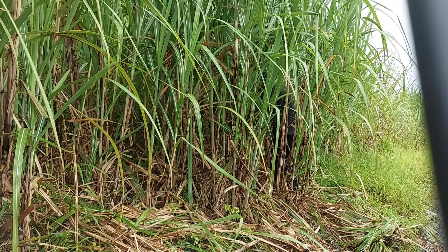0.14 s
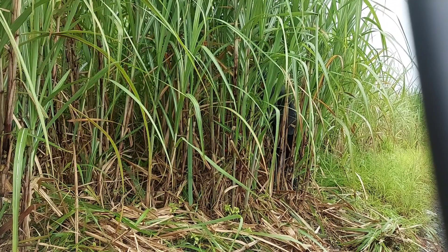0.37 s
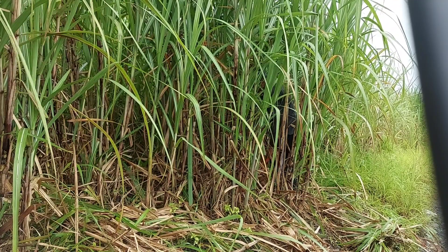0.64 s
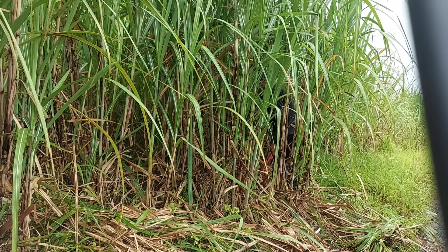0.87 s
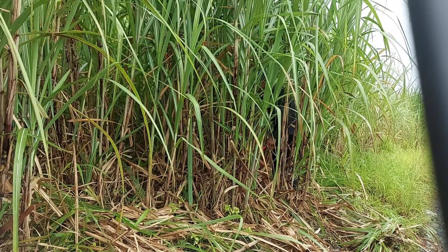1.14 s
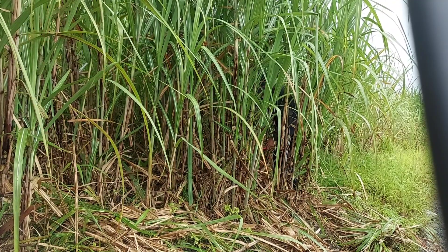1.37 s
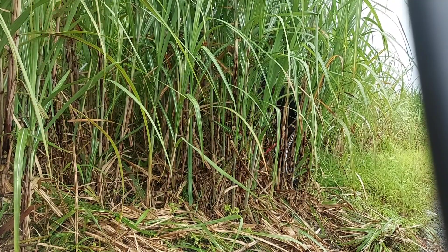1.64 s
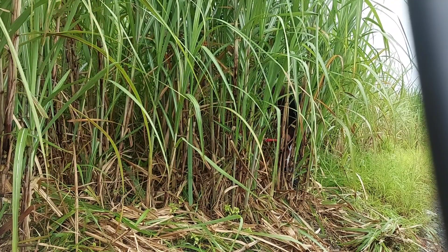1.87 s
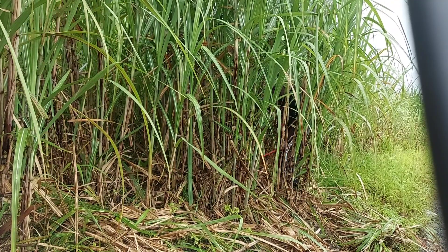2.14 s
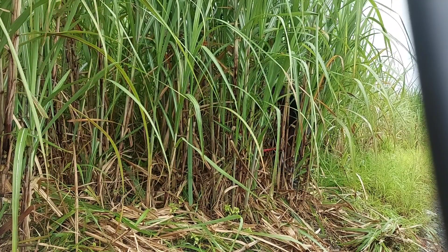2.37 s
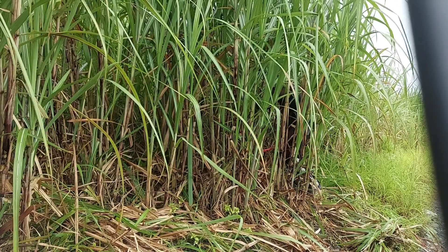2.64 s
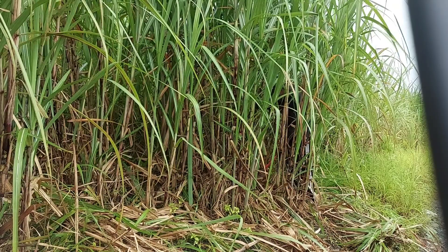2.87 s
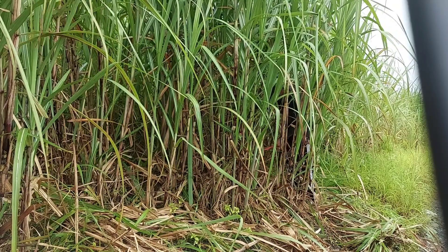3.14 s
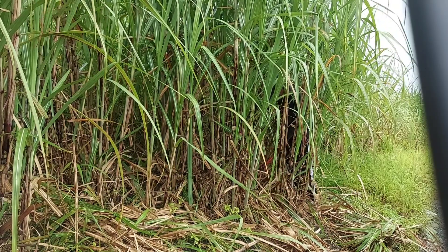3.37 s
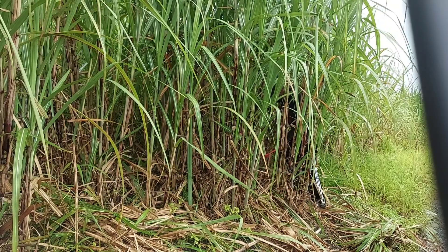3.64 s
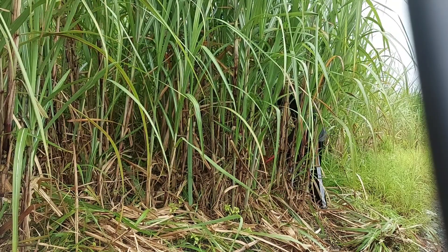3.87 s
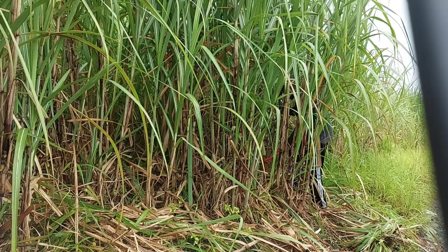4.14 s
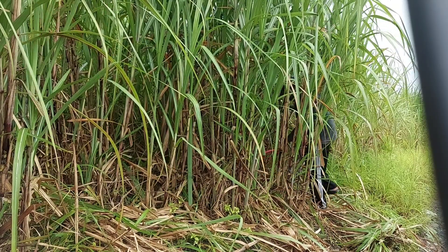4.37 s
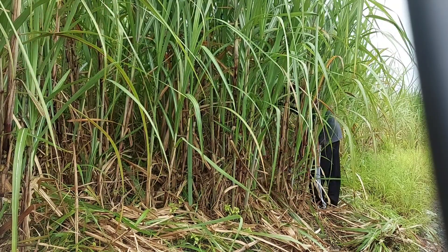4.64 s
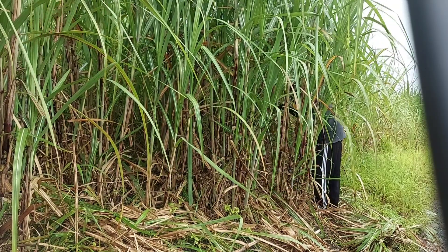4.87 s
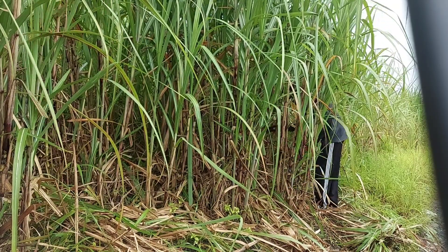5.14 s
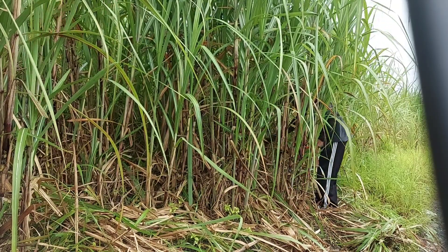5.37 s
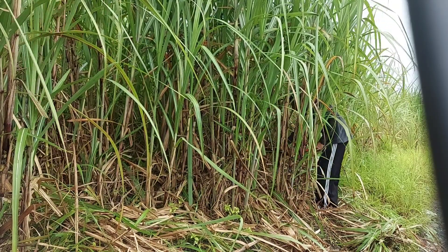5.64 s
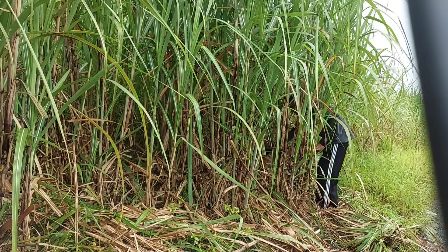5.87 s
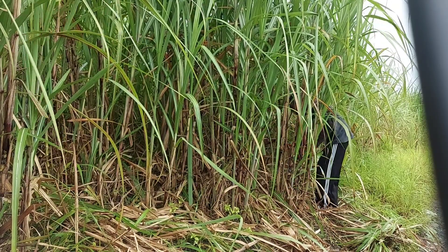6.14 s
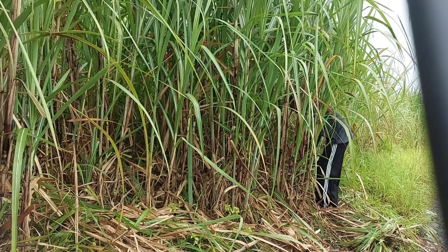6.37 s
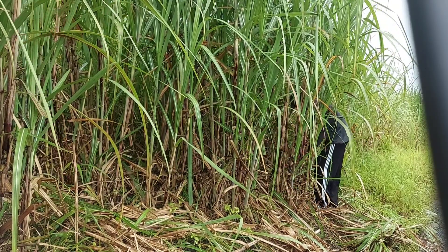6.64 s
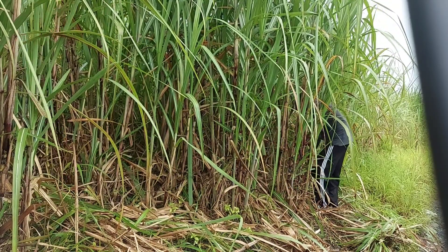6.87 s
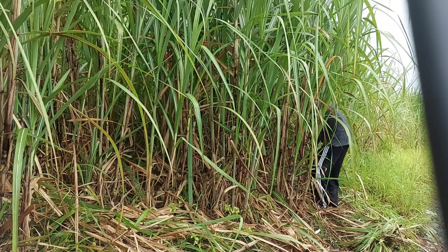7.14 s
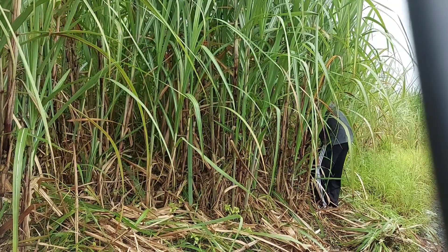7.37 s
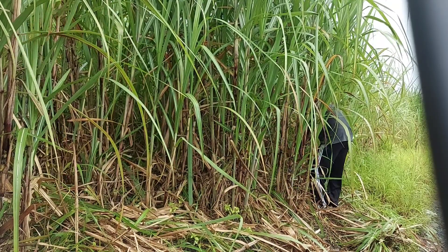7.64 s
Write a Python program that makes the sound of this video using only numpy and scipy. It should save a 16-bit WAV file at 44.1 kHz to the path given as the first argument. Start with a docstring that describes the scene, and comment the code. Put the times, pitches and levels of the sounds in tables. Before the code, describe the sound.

Someone strips dry leaves in a cane field, snapping and crackling in uneven bursts, over treble insect buzz, falling bird whistles and distant dove coos.

```python
"""Dry leaves are stripped in a cane field: tears and rustles are dense noise snaps shaped by effort,
and stalk cracks are clicks with a short ring and a low knock.
Insects buzz in the treble as resonated noise, one nearer insect chirps, a small bird whistles falling notes
and a dove coos far off, as gliding tones and breathy tones.
Filtered noise makes an uneven low rumble, a smooth faint background hiss and, late on, a far motor's hum."""
import sys
import numpy as np
from scipy import signal
from scipy.io import wavfile
from scipy.ndimage import uniform_filter1d

SR = 44100
rng = np.random.default_rng(int(sys.argv[2]) if len(sys.argv) > 2 else 0)


def transcribe(u):
    """Save the signal u as a 16-bit wav file named by the first command-line argument.

    u: samples, shape (n,) or (channels, n), limited to [-1, 1]; the rate is SR.
    q: integer samples, one column per channel.
    """
    v = np.clip(np.atleast_2d(u).T, -1, 1)
    q = np.round(v * 32767).astype(np.int16)
    wavfile.write(sys.argv[1], SR, q)


def magnitude_from_level(level_db):
    """Linear magnitude for a level in decibels (20 dB per decade)."""
    exponent = np.asarray(level_db, float) / 20
    return 10 ** exponent


N = 341775  # samples, 7.75 s


def evened(x):
    """Scales to rms 1."""
    return x / np.sqrt(np.mean(x ** 2) + 1e-20)


def read(points, hz):
    """Reads a spectrum table on a log-frequency axis."""
    f, value = np.transpose(points)
    return np.interp(np.log(hz + 1), np.log(f + 1), value)


def curve(points, t):
    """Reads a two-column time table at the times t."""
    return np.interp(t, *np.transpose(points))


def add(mix, s, sound):
    """Mixes a two-channel sound in at time s."""
    part = mix[:, round(s * SR):][:, :sound.shape[1]]
    part += sound[:, :part.shape[1]]


def pan(db):
    """Left and right gains for a level difference, left minus right."""
    return magnitude_from_level(np.array([[db / 2], [-db / 2]]))


def spectra(drive, same, side, lag, size):
    """Short-time spectra of a left-right pair: drive 0 is common, drives 1 and 2 belong to one side each."""
    hz, t, z = signal.stft(drive, SR, nperseg=size, noverlap=size * 3 // 4)
    likeness = np.clip(read(same, hz), 0, 1)[:, None]
    late = np.exp(-2j * np.pi * hz[:, None] * curve(lag, t) / SR)  # the left ear hears it later
    common = np.array([z[0] * late, z[0]])
    pair = np.sqrt(likeness) * common + np.sqrt(1 - likeness) * z[1:]
    return hz, t, pair * pan(read(side, hz)).transpose(0, 2, 1)


def patches(z, across, along):
    """Random field of rms 1, smooth over some bins and frames and shared by both sides."""
    grain = rng.standard_normal(z.shape[:0:-1]).T
    smooth = uniform_filter1d(grain, int(across), 0)
    return evened(uniform_filter1d(smooth, int(along), 1))


def sound_of(z, size):
    """Turns short-time spectra back into samples."""
    return signal.istft(z, SR, nperseg=size, noverlap=size * 3 // 4)[1][:, :N]


def scatter(x, t60, wet_db):
    """The stand of cane throws back a short diffuse tail, different on each side."""
    t = np.arange(SR // 4) / SR
    tail = rng.standard_normal((2, len(t))) * magnitude_from_level(-60 * t / t60) * (t > .003)
    wet = signal.oaconvolve(x, tail / np.linalg.norm(tail[0]), axes=1)[:, :N]
    return x + magnitude_from_level(wet_db) * wet


def resonate(x, hz, width_hz):
    """A resonance that follows the curve hz, applied twice for steep skirts."""
    turn = np.exp(2j * np.pi * np.cumsum(hz * np.ones(x.shape[-1])) / SR)
    r = np.exp(-np.pi * width_hz / SR)
    return 2 * (turn * signal.lfilter([(1 - r) ** 2], [1, -2 * r, r * r], x / turn)).real


# slow brushing through the stand between tears:
# t/s, effort level/dB, brightness/dB before each band's share
BRUSHING = [(0, -79, -8), (0.168, -72, -12), (.6, -63.5, -6), (.86, -87, -3), (1.1, -101, -4),
            (1.36, -84.5, -4), (1.63, -72.5, -3), (2.0, -66.5, -0.5), (2.5, -75, 2), (3.0, -65, -3.5),
            (3.27, -83, 8), (3.55, -68.5, 0.5), (3.85, -73, -3.5), (4.4, -64.5, -2), (4.95, -65, -22),
            (5.3, -75, -3), (5.85, -83.5, -1), (6.2, -78.5, 14), (6.45, -82, -2), (6.799, -83, -2),
            (7.05, -72, 8), (7.27, -89, 1), (7.75, -74.5, -1)]
# pulls and tears of leaves: peak t/s before each band's lag, effort level/dB, rise time/s to climb the last 20
# dB, # fall time/s to drop 20 dB before each band's stretch, brightness/dB before the share (dry blades up,
# thick sheaths down)
TEARS = [(.022, -70.5, .02, 0.1, 14), (.064, -58, 0.084, 0.03, 0.5), (.128, -66.5, .015, 0.091, 3),
         (.205, -66.5, 0.033, 0.22, 7.5), (.25, -60.5, 0.087, 0.17, 8), (0.293, -50, 0.047, 0.068, -3.5),
         (.32, -54, 0.054, 0.072, 0), (.41, -59, 0.053, .2, -5), (0.498, -55.5, 0.26, 0.15, 7),
         (.59, -62.5, 0.086, .15, 6.5), (.668, -52.5, 0.087, 0.18, 0), (.725, -57, .06, 0.16, 3),
         (.795, -57.5, 0.16, 0.041, 0.5), (.925, -72.5, 0.034, 0.3, 5), (.98, -72.5, 0.12, 0.037, 8),
         (1.49, -78.5, 0.033, 0.27, 12), (1.7, -71, .1, 0.1, 0), (1.886, -76, 0.099, .3, 2),
         (2.068, -54.5, .012, 0.047, -5), (2.13, -58.5, .1, .1, -8), (2.212, -54.5, 0.28, 0.18, -18.5),
         (2.28, -58, 0.12, 0.11, -9), (2.377, -61, 0.074, 0.23, -21), (2.642, -63, 0.012, 0.13, -12),
         (2.757, -61, 0.066, 0.16, -16), (2.819, -44, 0.029, 0.091, -1), (2.845, -51.5, 0.044, 0.12, 6),
         (2.89, -55, 0.13, 0.12, 5.5), (3.315, -59.5, 0.0099, 0.045, 8), (3.332, -42.5, 0.014, 0.073, -5.5),
         (3.36, -50, 0.034, 0.1, 6), (3.44, -61, .1, 0.19, -2), (3.59, -74, .05, 0.085, 7),
         (4.11, -67, 0.34, 0.13, -3), (4.262, -62, .2, 0.26, -11), (4.308, -56, .02, 0.2, -14),
         (4.6, -61, 0.041, .05, -10), (4.625, -40, 0.013, 0.093, -3), (4.68, -50, 0.12, 0.3, 3.5),
         (5.068, -66, 0.2, 0.045, -4), (5.564, -72, 0.064, 0.35, -18), (5.928, -79, 0.023, 0.18, 14.5),
         (6.013, -56.5, 0.013, .15, 5.5), (6.062, -53, 0.02, 0.052, 12.5), (6.093, -65, 0.021, 0.037, 13),
         (6.312, -76, .03, .15, -5), (6.495, -66.5, 0.038, 0.13, 11), (6.55, -70, 0.095, 0.11, 4.5),
         (6.892, -54.5, 0.016, 0.16, 6.5), (6.95, -55, 0.023, 0.11, -3), (7.0, -68, 0.08, 0.18, 8.5),
         (7.49, -75, 0.19, 0.52, 5)]
# how seven frequency bands of the rustle, low to high, answer a pull: f/Hz, level/dB,
# share of brightness, heft (extra dB per dB of a hard pull), lag/s, stretch of the fall
RUSTLE_BANDS = [(250, -12.5, 0.53, 0.51, 0.031, 0.86), (674, -8.5, 0.29, 0.19, 0.014, 0.9),
                (1310, -6.5, 0.075, .05, 0.0019, 1.03), (2200, -1.5, 0.04, -0.14, 0.00063, 0.81),
                (3400, -5.5, 0.38, -0.06, 0.00097, 1.06), (5750, -2.5, 0.68, -0.03, 0.0014, 0.93),
                (12500, 0, 0.91, 0.03, .003, 0.84)]


def effort(t):
    """Level of each rustle band in dB: every tear rises, falls and adds its power to the slow brushing."""
    easy_pull_db = -56
    shoulder = 1.16  # above 1 a tear holds for a moment and then drops ever faster
    hz, band_db, share, heft, lag, stretch = np.transpose(RUSTLE_BANDS)[:, :, None]
    s, brush_db, bright_db = np.transpose(BRUSHING)
    power = magnitude_from_level(np.interp(t, s, brush_db) + share * np.interp(t, s, bright_db)) ** 2
    for peak, db, rise, fall, bright_db in TEARS:
        after = t - peak - lag
        fallen = np.maximum(after / (fall * stretch), 0) ** shoulder
        drop_db = 20 * np.maximum(-after / rise, fallen)
        peak_db = db + heft * (db - easy_pull_db) + share * bright_db
        power = power + magnitude_from_level(peak_db - drop_db) ** 2
    return hz[:, 0], band_db + 10 * np.log10(power)


# tilt of the leaf noise within each band: f/Hz, level/dB (relative)
LEAF_TONE = [(88, -24), (150, 6), (230, -6), (333, -12), (521, -3.5), (574, -10.5), (1200, -7), (1740, -4),
             (1920, 1), (11700, -14), (15700, -20)]
# f/Hz, left-right likeness (0-1)
LEAF_LIKENESS = [(100, 0.99), (640, 0.82), (1400, 0.84), (3100, 0.4), (6800, 0.17), (15000, 0.043)]
# f/Hz, left minus right level/dB
LEAF_SIDE = [(60, 11), (240, 0), (950, 2), (3770, -1), (15000, 0.5)]
# far snaps blur into hiss: f/Hz, hiss gain against snaps
SMEAR = [(300, 2.2), (1500, 0.85), (4000, 1.36), (12000, 1.23)]
# the worker moves to the right: t/s, lag of the left ear/samples
WORKER_LAG = [(0, 0.58), (2, 1.65), (4.6, 2.38), (7.75, 2.54)]


def rustle(snaps_per_s=1500, spread_db=1.5, snap_t60=0.018, tick=0.19):
    """Dense tiny snaps of brittle leaf; effort sets the level of each frequency band."""
    patchy_db, flicker_db, gain_db = 0.5, -1.0, 1.38
    snap_size = magnitude_from_level(spread_db * np.minimum(rng.exponential(1, N), 3.6))
    snaps = snap_size * (rng.random(N) < snaps_per_s / SR)
    # hard start, quick crumble
    crumble = signal.lfilter([1], [1, -magnitude_from_level(-120 / SR / snap_t60)], snaps ** 2) ** .5
    drive = (evened(crumble) + tick * evened(snaps)) * rng.standard_normal((3, N))
    hz, t, z = spectra(drive, LEAF_LIKENESS, LEAF_SIDE, WORKER_LAG, size=256)
    hiss = spectra(rng.standard_normal((3, N)), LEAF_LIKENESS, LEAF_SIDE, WORKER_LAG, size=256)[2]
    z = z + read(SMEAR, hz)[:, None] * hiss
    z = z * magnitude_from_level(read(LEAF_TONE, hz))[:, None]

    # each band is first levelled, then follows its effort
    bands_hz, bands_db = effort(t)
    power = (abs(z) ** 2).mean((0, 2)) * 4 / 3  # share of the power that each bin holds
    bands = [(160, 350), (450, 950), (1000, 1600), (1800, 2600), (3400, 3800), (5900, 6900), (12000, 15500)]
    own_db = [10 * np.log10(power[(hz > low) & (hz < high)].sum()) for low, high in bands]
    reach = [read(list(zip(bands_hz, row)), hz)[:, None] for row in np.eye(len(RUSTLE_BANDS))]  # who rules a bin
    level_db = sum(r * (db - own) for r, db, own in zip(reach, bands_db, own_db))
    level_db = level_db + patchy_db * patches(z, 2.4, 11) + flicker_db * patches(z, 87, 6.5) + gain_db
    return sound_of(z * magnitude_from_level(level_db), size=256)


# rumble and hiss: f/Hz, level/dB per Hz (relative)
FIELD_TONE = [(20, -52), (36, -51), (50, -10), (66, -2), (115, -7.5), (160, -11), (200, -20), (320, -21),
              (390, -31.5), (1000, -40), (3300, -53), (6300, -38), (8600, -44), (12000, -39.5),
              (15700, -50)]
# f/Hz, left-right likeness (0-1)
FIELD_LIKENESS = [(25, 0.85), (60, 0.93), (120, 1), (290, 0.77), (640, 0.36), (1400, 0.15), (3500, 0.1),
                  (15000, 0.12)]
# f/Hz, left minus right level/dB
FIELD_SIDE = [(300, -0.5), (2400, 2.5), (4600, 9), (7300, -9), (9000, 16), (11000, 9), (15000, -3)]
# uneven level of the low rumbling noise, with chance lumps:
# t/s, level/dB before scaling by lumps and by frequency
RUMBLE_LEVEL = [(0, 4.5), (.26, -7), (.56, 5), (1.2, -7), (1.4, 9.5), (1.64, -10.5), (1.83, 5), (2.55, 2.5),
                (2.68, -9.5), (2.83, 2), (3.11, -3), (3.39, 3), (3.6, -11.5), (4.0, 0), (4.4, 6.5),
                (4.5, 0), (4.8, 4.5), (5.59, -5), (6.02, -1), (6.13, 21), (6.3, -3), (6.58, 15), (6.7, -2),
                (7.0, -1), (7.38, 3), (7.75, -6)]
# far engine drone: t/s, level/dB before scaling by frequency
DRONE = [(0, -0.5), (.6, 2.5), (1.3, -6), (2, 0), (2.6, -4.5), (3.6, 0), (4.2, 2), (5, 4), (6.8, 3.5),
         (7.2, 2.5), (7.75, 7.5)]


def field(patchy_db=1.82, lumps=0.77, lag=10.2):
    """Noise shaped into an uneven distant rumble and engine drone under a smooth faint background hiss."""
    left_lag = [(0, lag), (N / SR, lag)]  # samples
    hz, t, z = spectra(rng.standard_normal((3, N)), FIELD_LIKENESS, FIELD_SIDE, left_lag, size=2048)
    deep = read([(140, 0.51), (220, 0.13)], hz)[:, None]
    drone = read([(140, 0.083), (220, 0.54), (380, 0.94), (700, 0.45)], hz)[:, None]
    z = z * magnitude_from_level(read(FIELD_TONE, hz)[:, None] + patchy_db * patches(z, 20, 5.4))
    level_db = lumps * deep * curve(RUMBLE_LEVEL, t) + drone * curve(DRONE, t)
    steady = sound_of(z, size=2048)
    return magnitude_from_level(-54) * sound_of(z * magnitude_from_level(level_db), size=2048) / steady.std()  # -54 dB rms before level_db


# insect choruses: f/Hz, width/Hz of one resonance, throbs per second, throb depth (0-1),
# rms waxing and waning/dB, level/dB before swell and waxing, share of the common swell
CHORUSES = [(10330, 1200, 111, 0.3, 0.2, -61.5, 0.93), (7300, 750, 42, 0.1, 3.5, -71, 0.26),
            (5200, 1120, 69, 0, 2, -67.5, 0.38)]
# left minus right level/dB, one per chorus
CHORUS_SIDES = [6, -4, -6]
# all choruses swell and hush together: t/s, level/dB before each chorus's share
CHORUS_SWELL = [(0, -1), (.5, 6), (.8, 1), (1.05, -6.5), (1.35, -2), (2.1, 2), (2.6, -0.5), (3.25, 0.5),
                (3.7, -3.5), (3.95, -5.5), (4.3, -1.5), (4.7, -0.5), (5.1, -1.5), (5.6, -1), (6.5, 1),
                (6.9, -1), (7.4, -1), (7.6, -1), (7.75, 0)]


def insects():
    """Each chorus is scraping noise in one wing resonance, throbbing at the stroke rate where it has depth."""
    t, out = np.arange(N) / SR, np.zeros((2, N))
    swell_db = curve(CHORUS_SWELL, t)
    for (hz, width_hz, rate, depth, wax_db, db, share), side_db in zip(CHORUSES, CHORUS_SIDES):
        drift = 1 + .012 * evened(uniform_filter1d(rng.standard_normal(N), SR // 4))
        stroke = np.cumsum(rate * drift) / SR % 1
        throb = 1 - np.clip(depth, 0, 1) + 3 * depth * np.exp(-stroke / 0.69)
        scrape = rng.standard_normal((2, N)) * throb
        wander = uniform_filter1d(rng.standard_normal(N), size=2400)
        wax = evened(uniform_filter1d(wander, size=2400))  # singers join and drop out
        wings = resonate(resonate(scrape, hz, width_hz), hz, 2 * width_hz)
        out += evened(wings) * magnitude_from_level(db + share * swell_db + wax_db * wax) * pan(side_db)
    return out


# contour of one falling whistle: t/s, f/Hz before bend, level/dB relative to the note
WHISTLE = [(0, 3180, -15), (0.021, 3100, 4.5), (0.034, 2800, -6), (.045, 2750, 0), (.06, 2900, -3),
           (.074, 2990, -21)]
# whistled notes: start t/s, level/dB before the contour
NOTES = [(.042, -60), (0.843, -69), (0.913, -61.5), (0.993, -62), (1.642, -62), (1.714, -60), (2.418, -67),
         (2.485, -61.5), (2.564, -61), (3.446, -72), (3.521, -61), (3.969, -63), (4.046, -63), (4.846, -61),
         (5.536, -65), (5.599, -61.5), (5.676, -61.5), (6.772, -68.5), (6.847, -64.5), (7.598, -73),
         (7.658, -64.5), (7.73, -61.5)]


def whistles(waver=0.015):
    """A small bird's falling whistles: one gliding tone pattern, wavering and slightly repitched each time."""
    loud_note_db, shy = -61.5, 1.3  # softer notes lose their high opening, dB per dB
    out = np.zeros((2, N))
    s, hz, shape_db = np.transpose(WHISTLE)
    t = np.arange(0, s[-1], 1 / SR)
    for (at, db), (pitch, phase) in zip(NOTES, rng.standard_normal((len(NOTES), 2))):
        bend = 1 + .008 * pitch + waver * np.sin(2 * np.pi * (70 * t + phase))
        tone = np.sin(2 * np.pi * np.cumsum(np.interp(t, s, hz) * bend) / SR)
        opening_db = shy * min(db - loud_note_db, 0) * (t < s[2])
        note = tone * magnitude_from_level(np.interp(t, s, shape_db) + opening_db)
        add(out, at, magnitude_from_level(db) * pan(-1.1) * note * signal.windows.tukey(len(t), .2))
    return scatter(out, t60=0.14, wet_db=-1.5)


# single cracks: t/s, snap peak level/dB before gain_db, ring f/Hz, knock level/dB relative to the snap
CRACKS = [(0.0643, -28, 3210, -12), (0.12, -34.5, 4100, -23), (0.2909, -24.5, 2500, -20),
          (0.317, -31, 5700, -8), (0.5039, -27.5, 9150, -12.5), (0.406, -37, 2500, -16),
          (.533, -32, 2090, -25), (0.581, -33, 3110, -31), (0.6456, -25.5, 6740, -24),
          (0.668, -23, 5880, -20), (0.6761, -21.5, 4260, -21), (0.7188, -26, 4120, -15),
          (0.918, -41, 3770, -23), (1.902, -44.5, 1200, -17), (2.0698, -28, 1680, -18),
          (2.2103, -27, 2200, -30), (2.643, -36.5, 2330, -12.5), (2.7774, -31.5, 3140, -24),
          (2.8088, -32, 2330, -15), (2.818, -25, 2900, -7.5), (2.8307, -17, 3350, -19),
          (2.8708, -29.5, 3520, -10), (3.213, -43, 8000, -33), (3.315, -30, 5700, -28),
          (3.3268, -16.5, 5170, -24), (3.332, -22, 2100, -25), (3.3446, -19, 2280, -15),
          (3.3641, -17.5, 8050, -22), (3.4767, -35, 2900, -27), (3.8218, -37, 7300, -29),
          (4.3032, -35, 2100, -21), (4.6206, -22, 2400, -17), (4.632, -17.5, 2270, -14),
          (5.569, -41, 2810, -20), (5.925, -47, 4580, -24), (6.0134, -20, 5600, -24),
          (6.0266, -23, 4410, -23), (6.0526, -25.5, 5300, -24), (6.0625, -34, 7660, -34),
          (6.066, -24.5, 6350, -22), (6.0967, -19, 6100, -24), (6.8896, -34, 2300, -30),
          (6.9438, -23.5, 2300, -26), (6.962, -37, 1600, -15)]
# what a knocked stalk rings with: f/Hz, level/dB relative to the knock
STALK = [(335, -3), (700, -6), (1230, 1.5)]


def cracks(click=1.0, click_t60=0.0035, ring_t60=0.0075, knock_cycles=12, gain_db=-4.0):
    """A stalk or midrib snaps: a broad click, a few cycles of ring and a low knock."""
    out, t = np.zeros((2, N)), np.arange(2400) / SR
    for (s, db, hz, knock_db), grit in zip(CRACKS, rng.standard_normal((len(CRACKS), 2400))):
        ring = np.sin(2 * np.pi * hz * t) * magnitude_from_level(-60 * t / ring_t60)
        snap = ring + click * grit * magnitude_from_level(-60 * t / click_t60)
        # each knock mode falls 60 dB in knock_cycles
        knock = sum(np.sin(2 * np.pi * f * t) * magnitude_from_level(knock_db + d - 60 * t * f / knock_cycles) for f, d in STALK)
        crack = magnitude_from_level(db + gain_db) * (snap / abs(snap).max() + knock)
        left_lag = round(max(curve(WORKER_LAG, s), 0))
        add(out, s, np.array([np.roll(crack, left_lag), crack]))
    return scatter(out, t60=0.041, wet_db=-16.0)


# far coos: middle t/s, length/s, f/Hz, level/dB of the tone before fade and pan
COOS = [(1.037, 0.12, 612, -77.5), (1.417, .1, 610, -81), (1.502, .12, 620, -73), (1.808, 0.073, 600, -76),
        (3.069, .15, 615, -71), (3.174, 0.1, 610, -79), (3.265, .12, 610, -75.5), (4.137, 0.077, 605, -68),
        (5.33, .18, 615, -80), (5.435, 0.068, 615, -82), (5.823, 0.17, 1015, -82), (5.953, 0.11, 1020, -72),
        (6.251, 0.27, 620, -80), (6.597, 0.22, 625, -79), (7.328, .12, 610, -75.5),]


def coos(breathy_hz=25):
    """A far dove's soft coos: a steady tone mixed with narrow breath noise at the same pitch."""
    out = np.zeros((2, N))
    for (middle, length, hz, db), air in zip(COOS, rng.standard_normal((len(COOS), SR // 2))):
        t = np.arange(0, length, 1 / SR)
        breath = evened(resonate(air, hz, breathy_hz))[-len(t):]
        coo = np.sin(2 * np.pi * hz * t) + 1.1 * breath
        add(out, middle - length / 2, magnitude_from_level(db) * pan(-3.9) * coo * np.hanning(len(t)))
    return out


# raspy chirps of one nearer insect: middle t/s, length/s, level/dB before fade and pan
CHIRPS = [(1.381, 0.14, -69), (1.704, 0.094, -62), (1.9, 0.17, -61), (2.12, 0.1, -60), (2.354, 0.16, -61.5),
          (2.593, 0.15, -62), (3.261, .08, -79), (3.693, 0.09, -68), (3.915, 0.1, -66.5),
          (5.47, 0.1, -63.5), (5.662, 0.15, -63), (5.892, 0.15, -63), (6.136, .1, -60.5),
          (6.339, 0.095, -62), (6.79, 0.1, -72), (7.42, 0.084, -69), (7.72, 0.052, -66)]


def chirps():
    """One nearer insect rasps: noise pulsed 95 times a second in a resonance whose pitch sags."""
    t, out = np.arange(SR // 4) / SR, np.zeros((2, N))
    for (middle, length, db), rasp in zip(CHIRPS, rng.standard_normal((len(CHIRPS), 2, SR // 4))):
        count = min(int(length * SR), SR // 4)
        teeth = 1.6 + np.cos(np.pi * 95 * t[:count]) ** 2
        chirp = resonate(rasp[:, :count] * teeth, np.linspace(5000, 4550, count), 700)
        fade = signal.windows.tukey(count, .5)
        add(out, middle - length / 2, magnitude_from_level(db) * pan(-1.5) * evened(chirp) * fade)
    return out


# far hum: t/s, f/Hz, level/dB
MOTOR = [(5.9, 320, -85), (6.2, 338, -67.5), (6.7, 348, -78.5), (7.1, 373, -80), (7.6, 371, -84),
         (7.75, 362, -81)]


def motor():
    """A far motor hums late on: noise in a narrow resonance of moving pitch, the same on both sides."""
    s, hum_hz, hum_db = np.transpose(MOTOR)
    t = np.arange(N) / SR
    hum = evened(resonate(rng.standard_normal(N), np.interp(t, s, hum_hz), 16))
    return hum * magnitude_from_level(np.interp(t, s, hum_db, left=-200))


def scene():
    """All sources together."""
    return rustle() + field() + insects() + whistles() + cracks() + coos() + chirps() + motor()


def band_limit(x):
    """A steep low-pass at the top of the band."""
    return signal.sosfilt(signal.butter(12, 15980, fs=SR, output="sos"), x)


def record(dry):
    """Delivers the finished mix."""
    return band_limit(dry)


dry = scene()
out = record(dry)
transcribe(out)
```